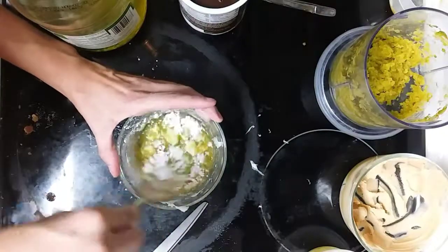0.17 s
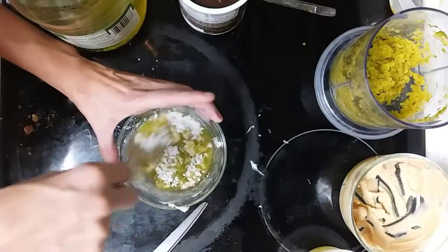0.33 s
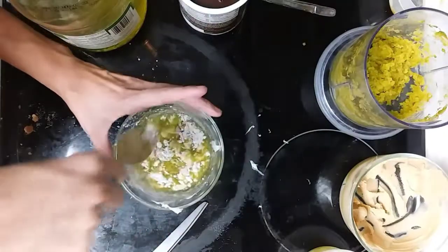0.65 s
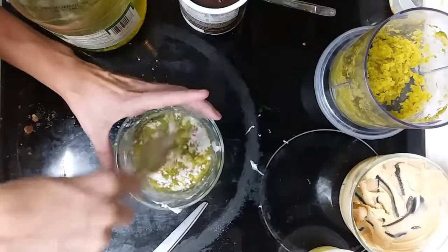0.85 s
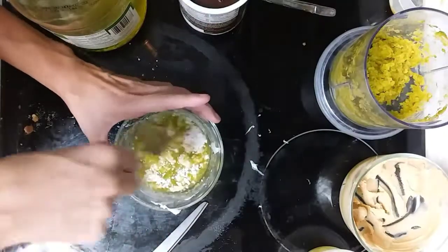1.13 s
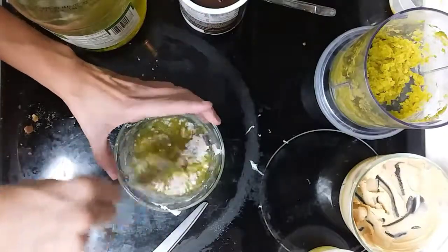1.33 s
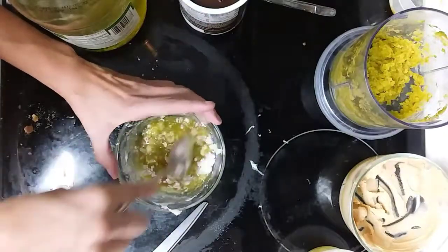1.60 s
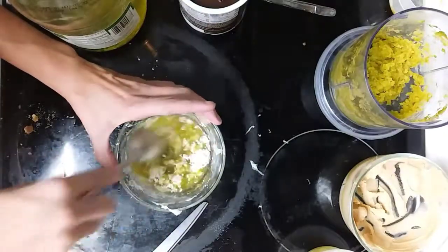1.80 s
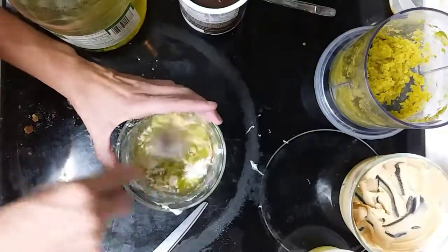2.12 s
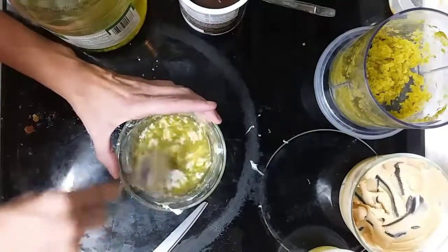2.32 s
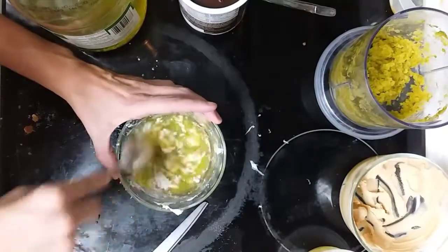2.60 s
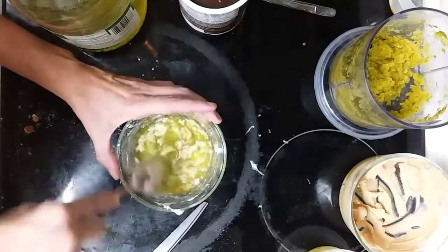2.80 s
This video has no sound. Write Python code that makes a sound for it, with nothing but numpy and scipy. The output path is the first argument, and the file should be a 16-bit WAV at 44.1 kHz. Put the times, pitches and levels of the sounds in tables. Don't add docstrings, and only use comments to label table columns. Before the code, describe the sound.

Spoon clinks sharply on a small glass bowl while stirring grainy wet paste in a kitchen

```python
import sys
import numpy as np
from scipy import signal
from scipy.fft import rfft, irfft, next_fast_len
from scipy.io import wavfile
from scipy.ndimage import uniform_filter1d, map_coordinates

SR = 44100
rng = np.random.default_rng(int(sys.argv[2]) if len(sys.argv) > 2 else 0)


def boost_factor(decibels):
    exponent = np.asarray(decibels, float) / 20
    return 10 ** exponent


def transcribe(u):
    v = np.clip(np.atleast_2d(u).T, -1, 1)
    q = np.round(v * 32767).astype(np.int16)
    wavfile.write(sys.argv[1], SR, q)


N = 130095

# (frequency [Hz], width [Hz], level [dB])
SPOON_MODES = [(1835, 160, -1.5), (2550, 370, 0.5), (3444, 520, 3), (4440, 530, 4.5), (5806, 340, 1),
               (6236, 290, 3.5), (7970, 1300, -9.5), (9304, 310, -0.5), (9260, 490, -8), (13800, 900, -13),
               (15800, 650, -22)]
# (frequency [Hz], width [Hz], level [dB])
COUNTER_MODES = [(150, 69, -8.5), (340, 37.8, 0.5), (393.7, 75, -4.5), (592, 230, -6), (852, 80, -4),
                 (1210, 160, -7.5)]
THUD_T60 = 0.036
BLOW_S = 0.00055


def unit(x):
    return x / np.sqrt(np.mean(x ** 2) + 1e-20)


def along(points, hz):
    f, v = np.transpose(points)
    return np.interp(np.log(hz + 1), np.log(f + 1), v)


def wobble(rate):
    knots = rng.standard_normal(int(N * rate / SR) + 4)
    return map_coordinates(knots, [np.arange(N) * rate / SR])


def filtered(x, response):
    m = next_fast_len(x.shape[-1] + 8192)
    return irfft(rfft(x, m) * response(np.fft.rfftfreq(m, 1 / SR)), m)[..., :x.shape[-1]]


def evened(x):
    z = rfft(x)
    lumps = uniform_filter1d(np.abs(z) ** 2, size=int(250 * len(x) / SR))
    return irfft(z / np.sqrt(np.abs(lumps) + 1e-20), len(x))


def body(peaks, tilt_db=0, broad=0):
    def response(f):
        total = broad
        for k, (c, w, db) in enumerate(peaks):
            total = total + (-1) ** k * boost_factor(db) * 1j * f * w / (c * c - f * f + 1j * f * w)
        return boost_factor(tilt_db * np.log2((f + 300) / 3000)) * total
    return response


def burst(t, t60, response, rise=BLOW_S):
    start = np.minimum(t / max(rise, 1e-4), 1)
    strike = 1.4 * boost_factor(-60 * t / 0.003)
    shape = (boost_factor(-60 * t / t60) + strike) * start
    force = evened(rng.standard_normal(len(t)) * shape) * start * (t < t[-1] / 2)
    x = filtered(force, response)
    return x / np.abs(x).max()


def kitchen(x, wet_db=0):
    # (frequency [Hz], t60 [s])
    room_decay = [(150, 0.73), (1000, 0.24), (4000, 0.27), (9000, 0.18), (16000, 0.24)]
    room_db, wall_s = -5.5, 0.0067
    hz, t, z = signal.stft(rng.standard_normal(len(x)), SR, nperseg=256)
    tail = signal.istft(z * boost_factor(-60 * t / along(room_decay, hz)[:, None]), SR, nperseg=256)[1]
    tail = tail / (1e-9 + np.abs(tail).max())
    tail = filtered(evened(tail), lambda f: np.sqrt(along(room_decay, f)))
    i = np.arange(len(tail))
    tail = tail * np.clip(i / SR / wall_s, 0, 1)
    tail = tail * np.clip(5 - 5 * i / len(tail), 0, 1)
    tail = tail / np.linalg.norm(tail)
    return x + boost_factor(room_db + wet_db) * signal.fftconvolve(x, tail)[:len(x)]


def room_tone():
    # (frequency [Hz], density [dB per Hz])
    air_spectrum = [(22, -40.5), (48, -0.5), (298, -2.5), (1150, -20), (1570, -32.5), (2100, -39.5),
                    (8990, -38.5), (15200, -51), (16500, -39.5)]
    # (frequency [Hz], level [dB rms])
    fridge = [(120, -68), (199, -56.5), (300, -78), (394, -68.5), (473, -66)]
    t = np.arange(N) / SR
    air = unit(filtered(rng.standard_normal(N), lambda f: boost_factor(along(air_spectrum, f))))
    air = air * boost_factor(-53 + 0.87 * wobble(6))
    hiss_band = body([(8800, 2130, 0)])
    hiss = boost_factor(-82.5) * unit(filtered(rng.standard_normal(N), lambda f: hiss_band(f) ** 3))
    hum = 0
    for hz, db in fridge:
        level = np.sqrt(2) * boost_factor(db + 2.5 * wobble(16))
        hum = hum + level * np.sin(2 * np.pi * hz * t + 1.2 * wobble(9))
    return air + hiss + hum


def paste():
    # (time [s], level [dB])
    effort = [(0.0, -54), (0.149, -64), (0.81, -94), (1.0, -80), (1.121, -72), (1.331, -83), (1.619, -74),
              (1.88, -64.5), (2.13, -66), (2.28, -58), (2.5, -62.5), (2.62, -55), (2.77, -54),
              (2.95, -57.5)]
    # (frequency [Hz], density [dB per Hz])
    paste_spectrum = [(400, -31.5), (900, 5.5), (1600, 9.5), (2400, -4.5), (4200, -0.5), (6000, -5),
                      (10000, -13.5), (16000, -45.5)]
    grains_per_s, grain_db, patch_db = 500, 1.5, 2.5
    s, db = np.transpose(effort)
    hits = rng.random(N) < grains_per_s / SR
    grit = hits * rng.standard_normal(N) * boost_factor(grain_db * rng.exponential(size=N))
    smear = unit(grit) + 2.5 * rng.standard_normal(N)
    z = signal.stft(smear, nperseg=512)[2]
    patches = uniform_filter1d(uniform_filter1d(rng.standard_normal(z.shape), 8, 0), 5, 1)
    smear = signal.istft(z * boost_factor(patch_db * unit(patches)), nperseg=512)[1][:N]
    level_db = np.interp(np.arange(N) / SR, s, db) + 1.8 * wobble(22)
    return unit(filtered(smear, lambda f: boost_factor(along(paste_spectrum, f)))) * boost_factor(level_db)


def contact_time():
    return np.arange(2 * SR // 5) / SR


def knocks():
    # (time [s], level [dB], hollow pitch [Hz], crack level [dB], rise [s])
    blows = [(.258, -25.5, 1290, -60, 0.0013), (1.137, -30, 1365, -34, 0.00047),
             (1.26, -30.5, 1393, -27, 0.00018), (.687, -34.5, 743, -56, 0.00048),
             (1.07, -32.5, 719, -60, 0.0013), (0.347, -44, 1180, -38, 0.0012),
             (.378, -49.5, 930, -36, 0.00095), (.479, -56, 8400, -69.5, 0.00038),
             (0.491, -65, 8400, -73, 0.0027), (.0, -37.5, 3170, -44, 0.00032),
             (.009, -39, 3370, -50.5, .0005), (1.824, -40, 3020, -57.5, 0.00066),
             (2.446, -32, 4180, -60, .0004), (2.633, -65, 3440, -49, .001),
             (1.406, -63.5, 1440, -58, 0.0077), (1.816, -39, 1820, -44.5, 0.004),
             (1.837, -35.5, 1650, -43.5, 0.00089), (1.915, -41, 900, -52, 0.00045),
             (2.108, -44, 1560, -47, 0.0021), (2.129, -20.5, 1560, -19.5, 0.00025),
             (2.13, -24.5, 1050, -30.5, 0.0017), (2.132, -19, 2240, -25.5, 0.00081),
             (2.202, -37, 1055, -52, 0.0011), (2.2512, -40.5, 1840, -60, 0.00043),
             (2.418, -27.5, 1730, -35, 0.0043), (2.4435, -16.5, 1906, -29, 0.00016),
             (2.458, -22.5, 2050, -31, 0.0016), (2.551, -42, 1540, -59, 0.0017),
             (2.939, -42.5, 1760, -46, 0.004)]
    hollow_q, overtone = 5.5, 1.9
    out, t = np.zeros(N + SR), contact_time()
    for s, db, hz, crack_db, rise in blows:
        cavity = body([(hz, hz / hollow_q, 0), (overtone * hz, overtone * hz / hollow_q, -10)])
        hollow = burst(t, 0.041, lambda f: cavity(f) ** 2, rise)
        thud = boost_factor(-8.5) * burst(t, THUD_T60, body(COUNTER_MODES), rise)
        crack = burst(t, 0.022, body(SPOON_MODES, -4.5, boost_factor(-8)), rise)
        blow = boost_factor(db) * (hollow + thud) + boost_factor(crack_db) * crack
        out[round(s * SR):][:len(t)] += kitchen(blow, -4)
    return out[:N]


def shares(table, s):
    return next((np.array(row[1:]) for row in table if abs(row[0] - s) < .01), np.zeros(4))


def ring(t, tilt_db, spot_db):
    # (frequency [Hz], level [dB], t60 [s])
    wall_modes = [(1323, -7, 0.19), (1429, -6, 0.13), (3008, -1.5, 0.2), (3127, -4, .12), (3210, -12, .12),
                  (5237, -5, 0.14), (5340, -2, 0.079), (5290, -5.5, .1), (5890, -10, 0.083), (8120, 0, 0.1),
                  (8040, -3, 0.083), (8030, -4.5, 0.039), (11470, -22.5, 0.13), (11840, -14, 0.11)]
    family_edges = [2000, 4000, 7000]
    longest_t60, shake_per_s, shake_db = .18, 140, -3
    after_db, after_t60, after_hz = -13, .42, 12000
    total = 0
    for hz, db, t60 in wall_modes:
        knots = rng.standard_normal((4, int(len(t) * shake_per_s / SR) + 4))
        a, b, c, d = [map_coordinates(k, [t * shake_per_s]) for k in knots]
        shake = 1 + boost_factor(shake_db) * min(hz / 5500, 1) * (a + 1j * b)
        glow = boost_factor(after_db - 60 * t / after_t60 * (1 + hz / after_hz)) * (c + 1j * d)
        shape = boost_factor(-60 * t / min(t60, longest_t60)) * shake + glow
        level_db = db + spot_db[np.searchsorted(family_edges, hz)] + tilt_db * np.log2(hz / 3000)
        total = total + boost_factor(level_db) * np.imag(shape * np.exp(2j * np.pi * hz * t))
    return total * np.minimum(t / BLOW_S, 1)


def clinks():
    # (time [s], ring level [dB], crack level [dB], thud level [dB], brightness [dB per octave])
    blows = [(.009, -56, -36, -31.5, -13.5), (.218, -27.5, -6.5, -13.5, 1.5), (.567, -36, -26, -18.5, -8.5),
             (0.615, -50, -52, -58, -4), (0.659, -63, -50, -57, -4), (0.686, -56, -42, -59, -5),
             (0.727, -62.5, -46.5, -56, -0.5), (.945, -22, -11, -14.5, -1.5),
             (1.069, -50, -37.5, -38, -3.5), (1.107, -77, -45.5, -41, 6), (1.138, -54, -30, -29, 3.5),
             (2.65, -18, -10.5, -30.5, -3)]
    # (time [s], mode level near 1.4, 3, 5.3 and 8 kHz [dB each])
    spots = [(.218, -4.5, -4.5, 8, 5.5), (.567, -6, -2, 7.5, -4), (.614, -4.5, -4.5, -9, -1),
             (.945, -2.5, 0, 3.5, -4), (.009, -5, 1, 0.5, 0.5), (1.069, 7, 0, -7, -0.5),
             (1.137, -17, 4.5, -6, -11.5), (2.65, -3, -2, 2, 2.5)]
    # (time [s], mode level near 1.9, 2.5, 3.5 and 4.4 kHz [dB each])
    grips = [(.218, 2, -3, -2.5, -1.5), (.567, 17.5, 2, 2, -2), (.614, 0, -3.5, -3, -4),
             (.945, 7.5, -0.5, -1, -6), (1.137, 14.5, 11, -2, -3.5), (2.65, -28, 3, 0, -1.5)]
    # (frequency [Hz], level [dB])
    skirts = [(1370, -5), (3050, -2.5), (5340, -5), (8100, -1.5)]
    skirt_hz, skirt_db, skirt_t60 = 420, 11, .045
    in_room = .55
    out, t = np.zeros(N + SR), contact_time()
    for s, ring_db, crack_db, thud_db, tilt_db in blows:
        spot_db = shares(spots, s)
        damped = [(hz, skirt_hz, db + d) for (hz, db), d in zip(skirts, spot_db)]
        skirt = burst(t, skirt_t60, body(damped, tilt_db))
        grip_db = np.pad(shares(grips, s), (0, len(SPOON_MODES)))
        held = [(hz, w, db + d) for (hz, w, db), d in zip(SPOON_MODES, grip_db)]
        steel = body(held, 0.5 * tilt_db, boost_factor(-18.5))
        snap = boost_factor(2.5) * burst(t, 0.012, steel, rise=0)
        crack = burst(t, 0.041, steel) + snap
        wall = boost_factor(ring_db) * ring(t, tilt_db, spot_db)
        thud = boost_factor(thud_db) * burst(t, THUD_T60, body(COUNTER_MODES))
        blow = in_room * wall + boost_factor(ring_db + skirt_db) * skirt + boost_factor(crack_db) * crack + thud
        out[round(s * SR):][:len(t)] += (1 - in_room) * wall + kitchen(blow)
    return out[:N]


def bumps():
    # (time [s], level [dB], pitch [Hz])
    thumps = [
        (.010, -38, 250),
        (0.222, -33.5, 105),
        (0.568, -42, 150),
        (1.832, -42.5, 150),
        (2.649, -29, 85),
    ]
    out, t = np.zeros(N + SR), contact_time()
    for s, db, hz in thumps:
        out[round(s * SR):][:len(t)] += boost_factor(db - 60 * t / 0.091) * np.sin(2 * np.pi * hz * t)
    return out[:N]


def swell(s, long):
    return np.sin(np.pi * np.clip((np.arange(N) / SR - s) / long, 0, 1))


def scrape():
    # (start [s], length [s], level [dB])
    strokes = [
        (0.01, .1, -93),
        (0.3, 0.11, -60),
        (0.363, 0.12, -65.5),
        (0.582, 0.23, -63.5),
        (0.982, 0.19, -58),
        (1.697, .12, -71.5),
        (2.28, 0.35, -66.5),
        (2.5, 0.23, -64),
        (2.85, 0.11, -76),
    ]
    ticks_per_s = 1300
    ticks = (rng.random(N) < ticks_per_s / SR) * rng.standard_normal(N)
    rough = unit(ticks) + 1.3 * rng.standard_normal(N)
    drag = unit(filtered(rough, body(SPOON_MODES, -3, boost_factor(11))))
    return drag * sum(boost_factor(db) * swell(s, long) for s, long, db in strokes)


def wet_rubs():
    # (start [s], length [s], level [dB], frequency [Hz])
    songs = [(.86, 0.065, -79.5, 8020), (1.394, 0.027, -62.5, 1500), (1.465, 0.093, -77, 2550),
             (1.54, 0.033, -68, 1540), (1.658, 0.075, -65, 1685), (1.738, 0.15, -61.5, 1498),
             (2.004, 0.045, -65.5, 4500), (1.993, 0.046, -65, 3350), (2.286, 0.072, -74, 4500),
             (2.292, 0.039, -69, 3200), (2.607, 0.021, -54, 1460), (2.534, 0.0096, -63, 8000),
             (2.556, .016, -69, 9000), (2.63, .01, -63, 7500), (2.856, 0.089, -58, 1830)]
    q = 6.9
    noise, total = rng.standard_normal(N), 0
    for s, long, db, hz in songs:
        band = body([(hz, hz / q, 0)])
        total = total + boost_factor(db) * swell(s, long) * unit(filtered(noise, lambda f: band(f) ** 2))
    return total


def scene():
    # (frequency [Hz], side over mid [dB])
    uneven = [(60, -61.5), (200, -56.5), (600, -36.5), (1500, -33), (3500, -34.5), (8100, -27.5),
              (12000, -39.5)]
    pressure = boost_factor(3.9 * wobble(33))
    friction = (scrape() + wet_rubs()) * pressure
    mid = room_tone() + paste() + knocks() + clinks() + bumps() + friction
    side = filtered(mid, lambda f: boost_factor(along(uneven, f)))
    return np.array([mid - side, mid + side])


def top_cut(x):
    return signal.sosfilt(signal.butter(12, 17070, fs=SR, output="sos"), x)


def record(dry):
    ceiling, low_hz, top_hz = .95, 65, 15750
    soft = dry / (1 + np.abs(dry / ceiling) ** 6) ** (1 / 6)

    def band(f):
        low_cut = (1j * f / (low_hz + 1j * f)) ** 2
        return low_cut * (0.026 + 1 / (1 + (f / top_hz) ** 300))
    mix = filtered(soft, band)
    return top_cut(mix)


dry = scene()
out = record(dry)
transcribe(out)
```